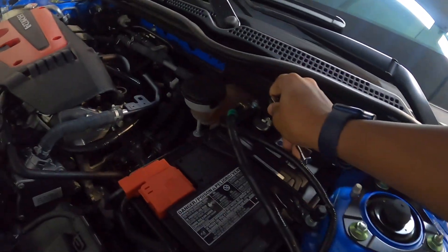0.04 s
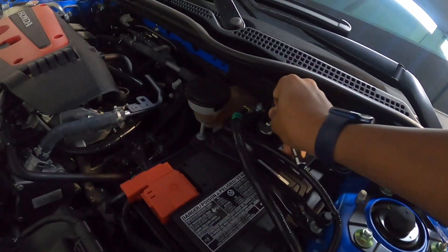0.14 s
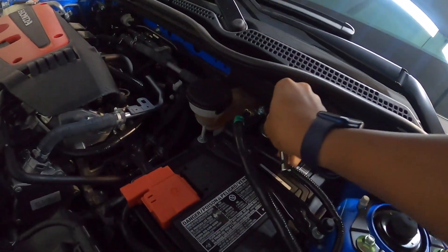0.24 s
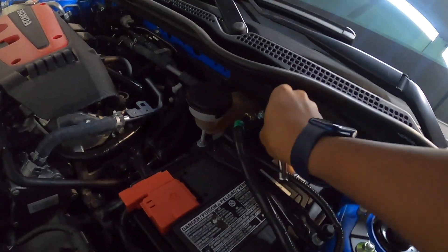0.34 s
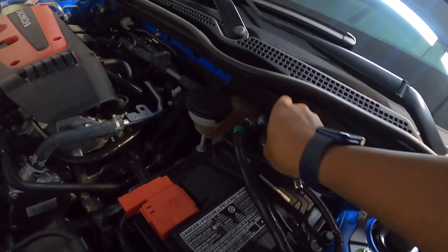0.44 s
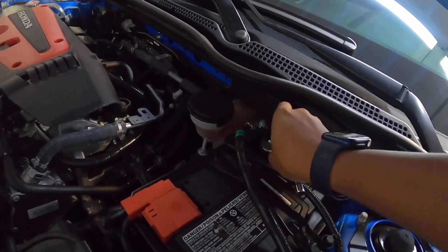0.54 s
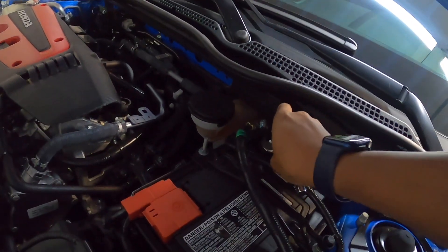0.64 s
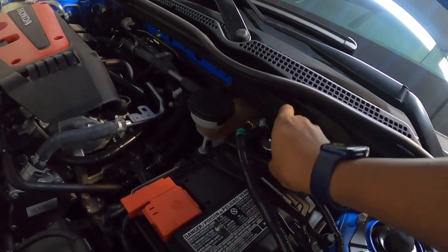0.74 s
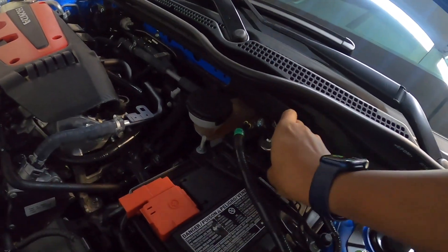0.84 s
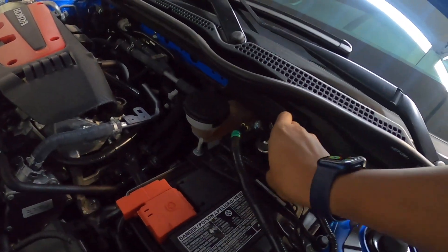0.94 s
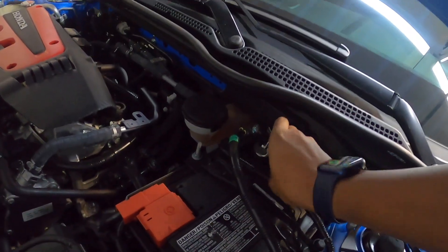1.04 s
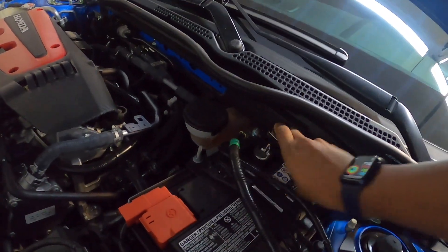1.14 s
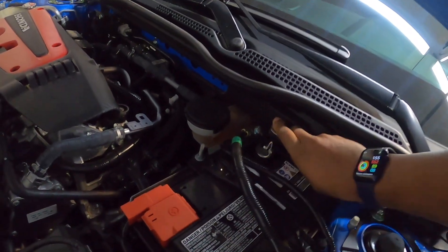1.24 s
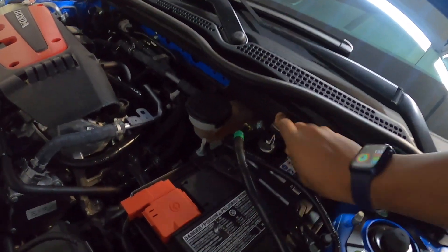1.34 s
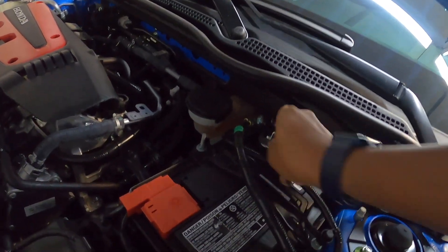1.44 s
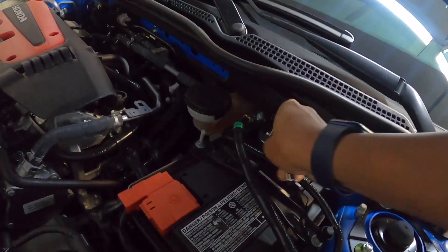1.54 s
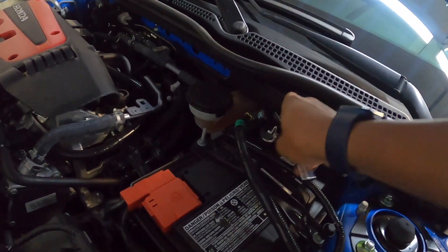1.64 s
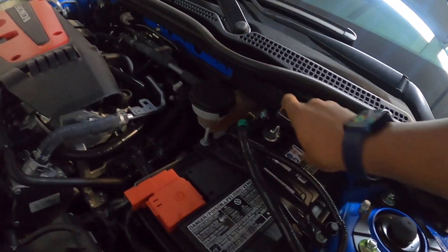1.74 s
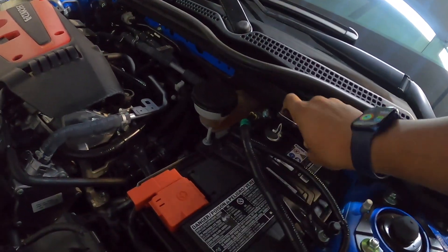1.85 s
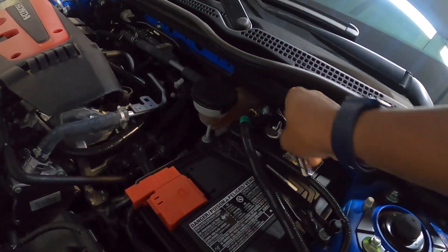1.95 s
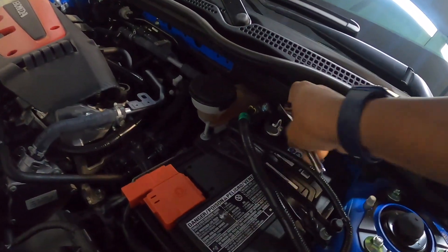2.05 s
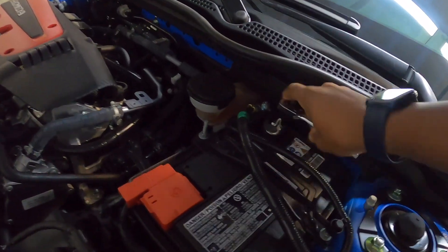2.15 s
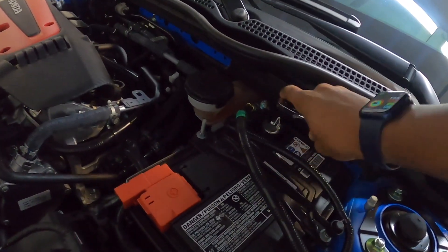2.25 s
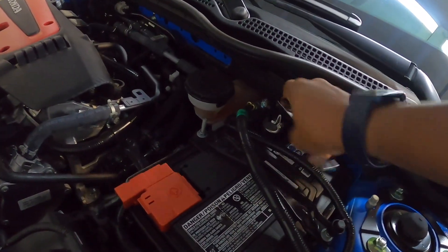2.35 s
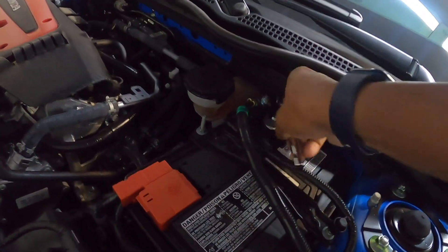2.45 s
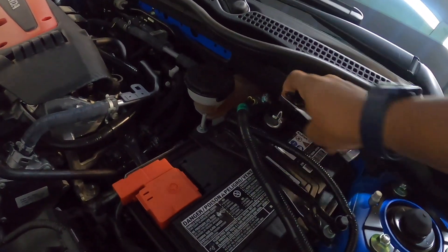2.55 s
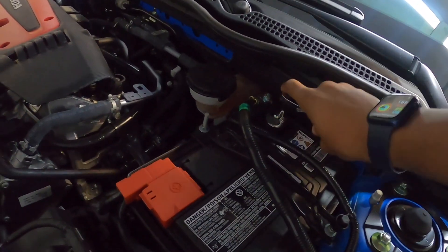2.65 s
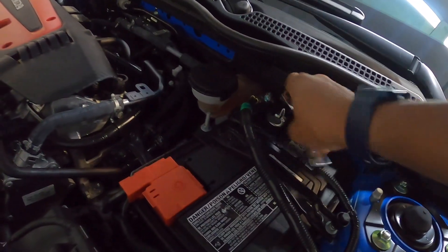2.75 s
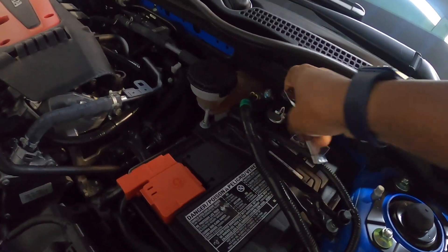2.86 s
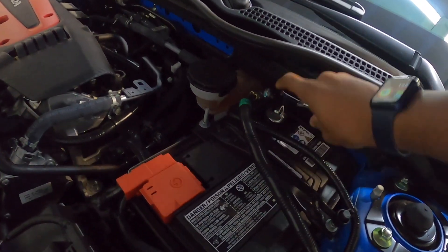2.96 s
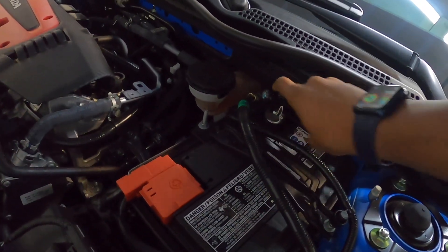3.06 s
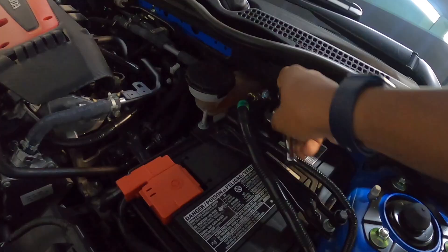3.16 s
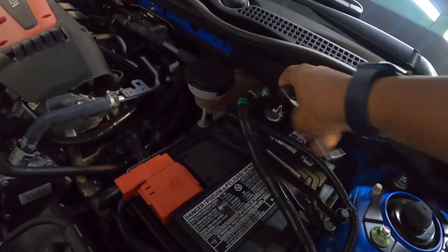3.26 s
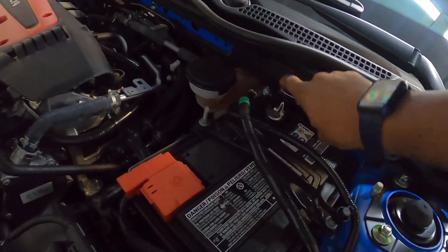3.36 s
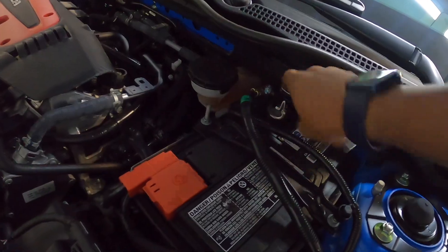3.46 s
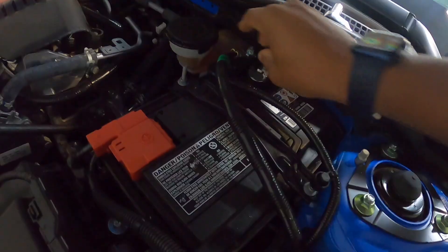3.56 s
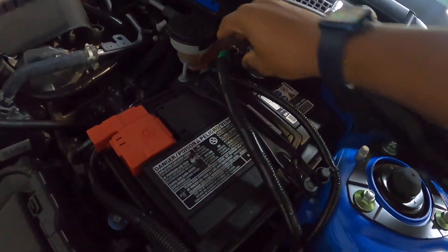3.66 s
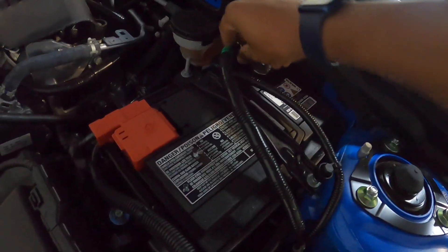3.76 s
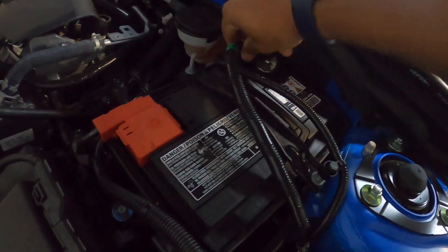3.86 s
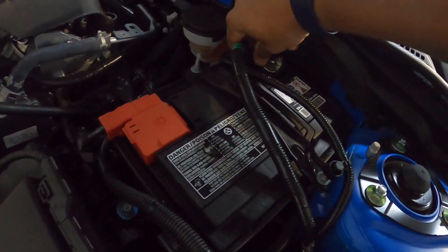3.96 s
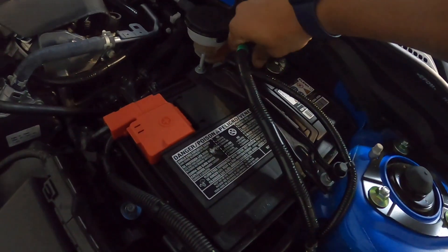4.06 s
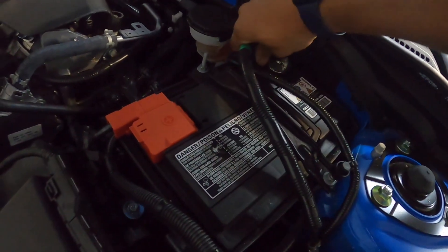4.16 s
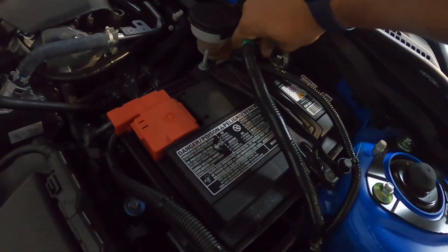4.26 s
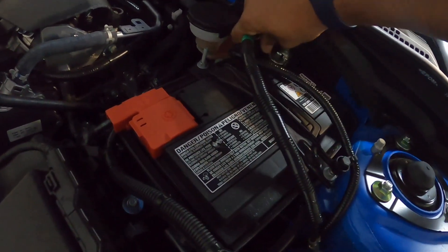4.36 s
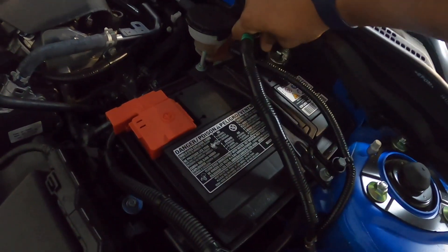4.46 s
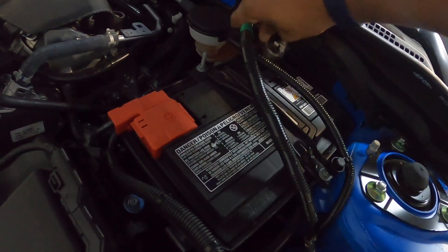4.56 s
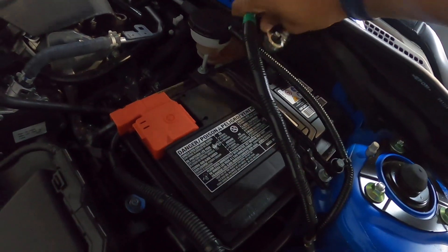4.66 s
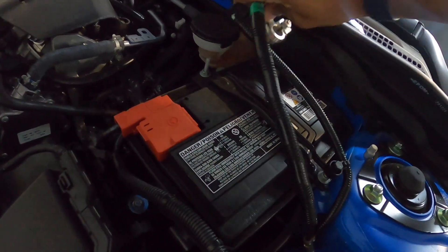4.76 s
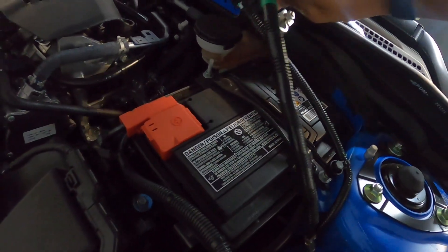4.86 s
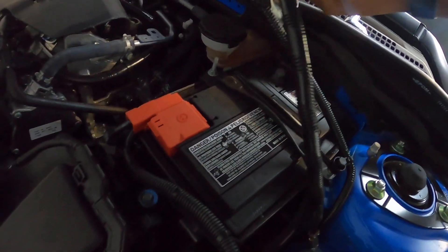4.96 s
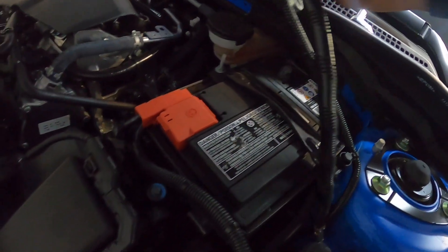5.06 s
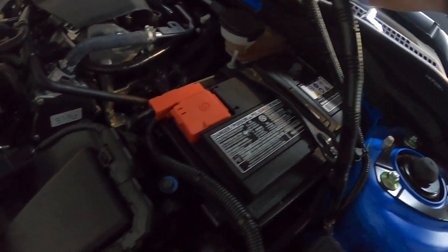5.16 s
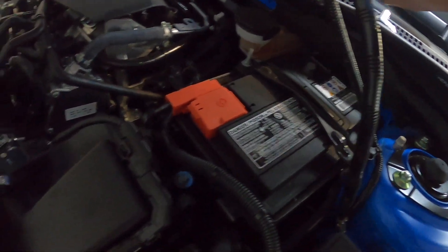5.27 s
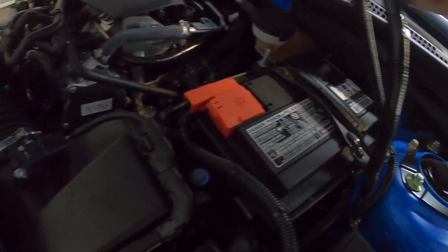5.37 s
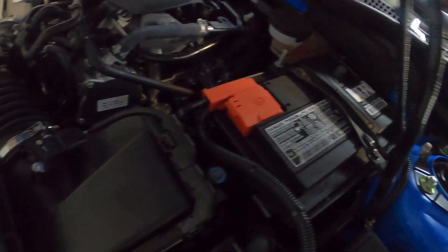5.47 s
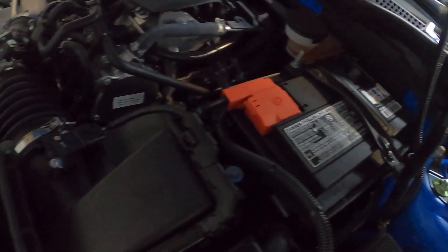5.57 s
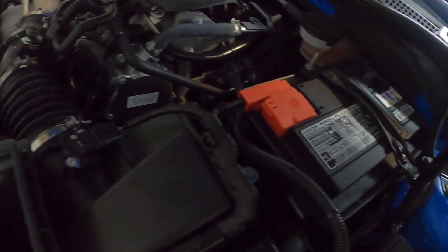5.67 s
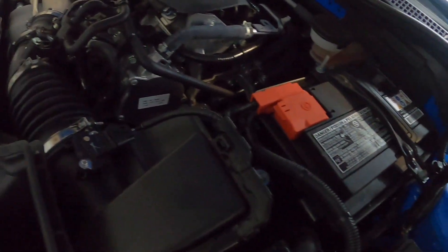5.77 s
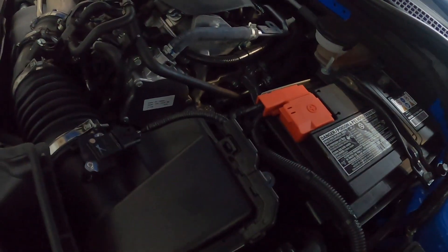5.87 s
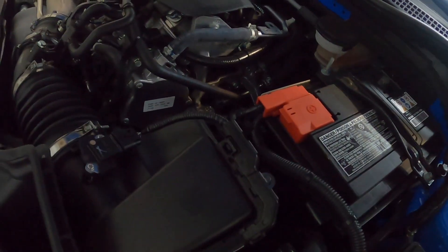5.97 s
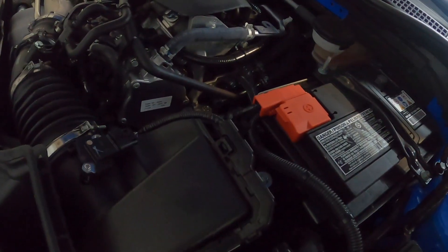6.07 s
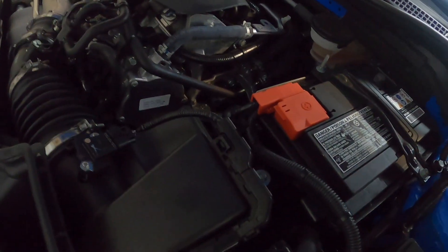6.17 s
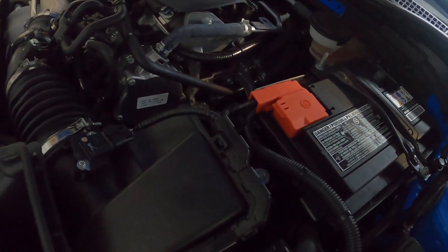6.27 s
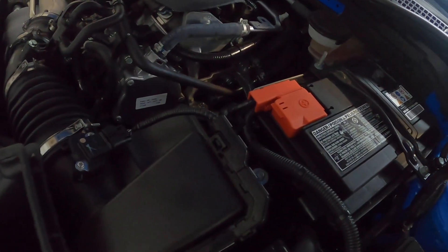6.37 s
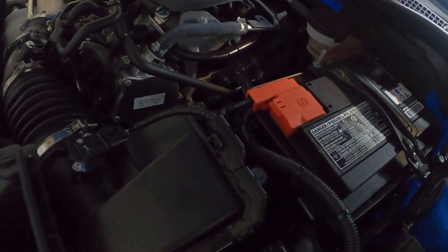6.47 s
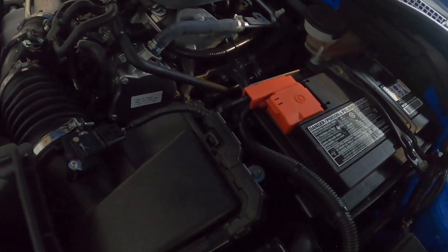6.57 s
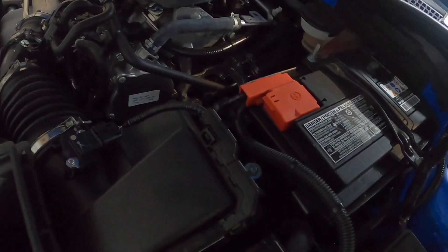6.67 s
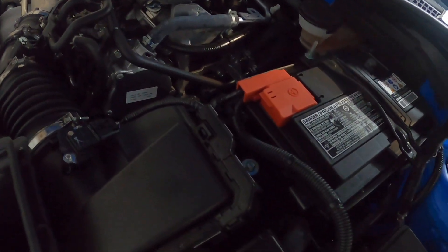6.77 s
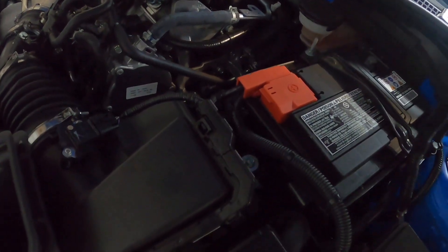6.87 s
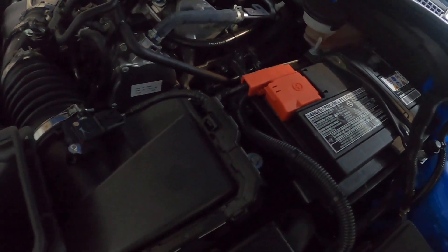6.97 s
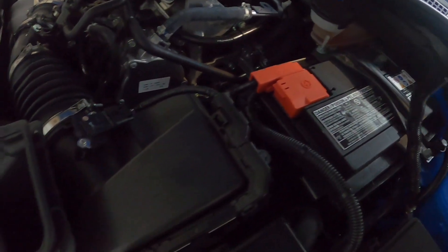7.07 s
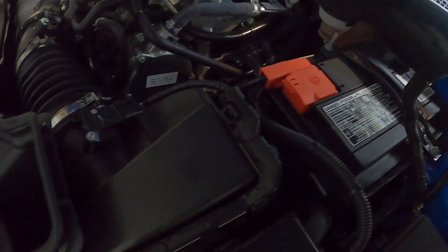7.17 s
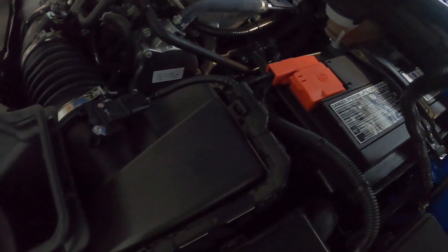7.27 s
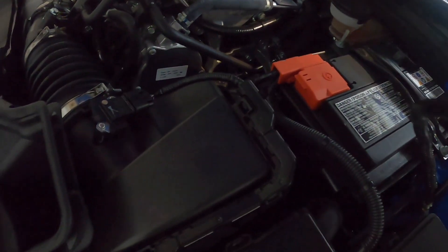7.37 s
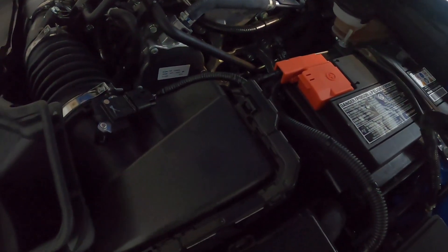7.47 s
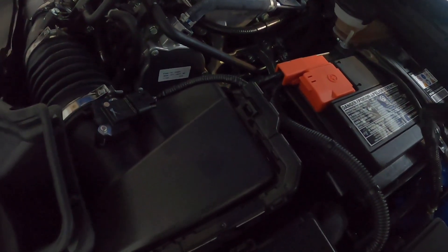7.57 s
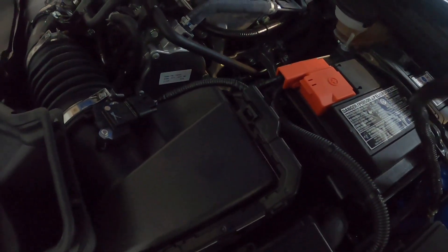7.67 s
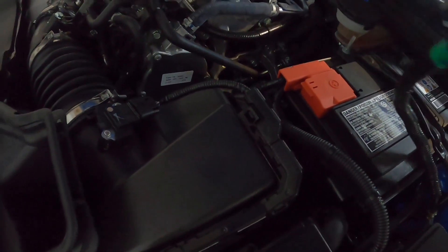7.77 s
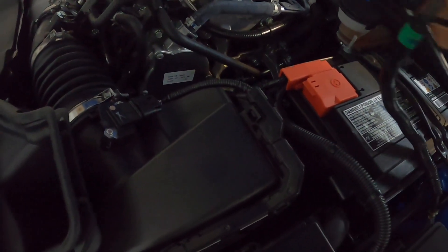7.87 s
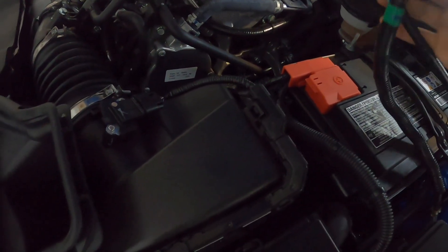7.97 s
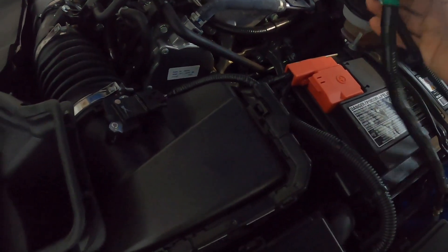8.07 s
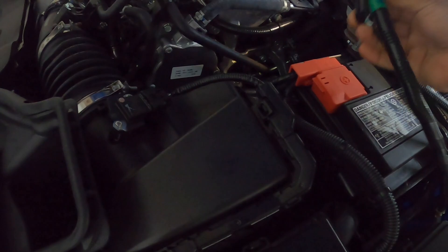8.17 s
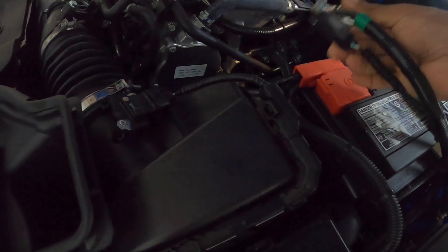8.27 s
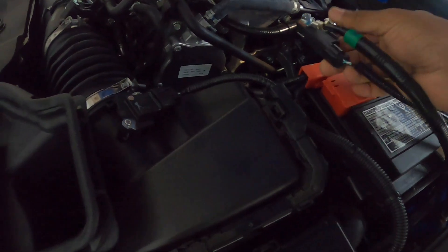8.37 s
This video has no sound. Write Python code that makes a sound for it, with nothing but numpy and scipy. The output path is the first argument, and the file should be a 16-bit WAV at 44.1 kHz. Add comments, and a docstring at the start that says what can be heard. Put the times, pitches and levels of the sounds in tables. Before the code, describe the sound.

Close above a car engine bay in a garage, a far air tool whirs down while metal knocks once sharply. A ratchet then clicks in quick separate runs, with loose clanks, short squeaks and sinking thuds on the battery case between. After a tiny break, clamp knocks and a hard bump follow. Later there is mostly soft rumbling air, dry plastic ticks and one rapid zip of a ribbed cable sleeve.

```python
"""A ratchet wrench loosens a car battery terminal in a garage, heard from close above the engine bay.
Runs of pawl clicks come from noise bursts ringing metal modes; between them loose parts knock and squeak.
Blows make the battery case thud with sinking tones. Later the ribbed cable sleeve ticks and zips aside.
Hands and cable rub as filtered noise, a far air tool whirs away in puffs, and ventilation rumbles softly.
Random reflections place the work in the engine bay and the garage."""
import sys
import numpy as np
from scipy import signal
from scipy.fft import rfft, irfft, next_fast_len
from scipy.io import wavfile
from scipy.ndimage import uniform_filter1d

SR = 44100
rng = np.random.default_rng(int(sys.argv[2]) if len(sys.argv) > 2 else 0)


def to_wav(sig):
    """Store sig (one row per channel, or 1-D mono) as 16-bit WAV at the path in sys.argv[1].

    Samples outside -1..1 are clipped; the rate is SR.
    """
    pcm = np.clip(np.atleast_2d(sig), -1, 1) * 32767
    pcm = np.round(pcm).astype(np.int16)
    wavfile.write(sys.argv[1], SR, pcm.T)  # frames by channels


N = 371010
TIME = np.arange(N) / SR

# In hit tables, level_db is the level before the band balance, and brightness tilts it around PIVOT_HZ.
# Pawl dropping over a tooth: start_s, level_db, brightness_db_per_octave, head_ring_db (re the click)
PAWL_CLICKS = [(1.3968, -25.5, -4.5, 2), (1.4114, -24.5, 0, 0.5), (1.4275, -22.5, -1, -3),
               (1.442, -24.5, 2.5, -2), (1.4555, -25, 1, -3), (1.470, -23, 1.5, -1),
               (1.4855, -19, -2.5, -4.5), (1.500, -23.5, 1.5, -4), (1.5166, -22, -1, -7),
               (1.5425, -22.5, 0, -16), (1.743, -26.5, -1.5, -6.5), (1.9375, -23.5, 1, 2.5),
               (1.948, -24, -1, 1), (1.9585, -21, 0.5, -2), (1.9685, -21, -0.5, -0.5),
               (1.9793, -20.5, 0, -1.5), (1.992, -23.5, 0.5, 2), (2.0097, -21.5, 1.5, -4.5),
               (2.3823, -24, 1, -2), (2.3924, -21, -4, 1), (2.4008, -20, -0.5, -2), (2.409, -21.5, 2, 3),
               (2.4155, -18, 0, -3), (2.422, -22, 0, -3), (2.4303, -19.5, 0, -5), (2.4396, -18.5, 0, 1.5),
               (2.4542, -21, -1, -1), (2.7405, -21, -6, 0), (2.7718, -22, -1, 4), (2.7815, -23, -1, 3),
               (2.7895, -22.5, 1, 6.5), (2.7973, -22.5, 0.5, 6), (2.8045, -20.5, -2.5, -1),
               (2.8116, -22, 1, 4.5), (2.8202, -23.5, -2, -5), (2.8285, -25, 0.5, 1), (2.8392, -22, 0, -7),
               (2.989, -23, 0, -1), (3.137, -32, 3, 0), (3.146, -22.5, 0, -1), (3.156, -21.5, 1, -5),
               (3.163, -26, -0.5, -1), (3.1695, -22, 1, 1.5), (3.1778, -19.5, -1, 1),
               (3.1863, -24.5, 1.5, -2), (3.195, -23.5, 0.5, 3), (3.2085, -26.5, 1.5, -6),
               (3.2317, -28.5, 2, 3.5), (3.5096, -26, 0.5, 0), (3.5217, -29, 3, 5), (3.5308, -22.5, 1, 3),
               (3.5383, -25.5, 0.5, 6), (3.5462, -21.5, -1, 2), (3.5528, -21, 1, 2), (3.5594, -21.5, 0, 0),
               (3.5662, -22.5, -1, -4), (3.5735, -24.5, 0.5, 7)]
# Socket, nut and clamp knocking: start_s, level_db, brightness_db_per_octave, low_thud_db (re the knock)
METAL_KNOCKS = [(.2695, -10, 2, -20.5), (.436, -35, 0, -12), (.46, -37, -7, -4), (.474, -56, -17.5, -9),
                (.711, -48, -3.5, -8), (1.344, -34, 0, -15), (1.3565, -31.5, 7, -11), (1.375, -35, -6, -2),
                (1.588, -29.5, -5, -13), (1.704, -37, 7, -16), (1.874, -42.5, -1, -26),
                (1.885, -42, -3, -20), (1.901, -38.5, -10.5, -8), (1.922, -30, -1.5, -3.5),
                (2.088, -32.5, 2, -3.5), (2.332, -32, 1, -16), (2.353, -25, 0.5, -8.5),
                (2.562, -24, 0.5, -19.5), (2.726, -34, 0, -7), (2.757, -28.5, 6, -8),
                (2.895, -25.5, -3.5, -12.5), (2.919, -26.5, 3.5, -9.5), (2.936, -30, -2, -8),
                (2.967, -41, 10.5, -10), (3.093, -27, -4, -9.5), (3.123, -21.5, -1, -27),
                (3.254, -29.5, -5, -25), (3.283, -30.5, -2, -12), (3.311, -35.5, 0, -7),
                (3.478, -27, 1.5, -13), (3.72, -45.5, 2.5, -1.5), (3.943, -53, 9, 3),
                (4.029, -37.5, 9.5, -7.5), (4.035, -25.5, -7, -11.5), (4.041, -28, -10, -20),
                (4.0485, -25.5, -6, -34), (4.281, -32.5, 9.5, -1), (4.299, -21, -6, -19),
                (4.311, -33, 8, 5), (4.332, -28, -8.5, -6), (4.343, -31, 13, -14), (4.399, -41, 5, -7),
                (4.488, -40.5, 11.5, 5), (4.529, -20.5, -4, -13), (4.574, -37.5, 6, -10)]
# Wrench and clamp hitting the battery: start_s, crack_db, brightness_db_per_octave, thud_peak_db,
# start_pitch_hz, final_pitch_hz, swell_s
BATTERY_BLOWS = [(.277, -41, -2, -30, 260, 154, 0.0077), (1.226, -28.5, 2.5, -21, 603, 244, 0.0034),
                 (1.366, -48, -8, -32.5, 397, 210, .007), (1.619, -39, 2, -31, 396, 168, 0.0055),
                 (2.103, -35, -4, -35, 400, 180, 0.0088), (2.211, -25.5, -1.5, -22.5, 610, 200, 0.005),
                 (2.6305, -23.5, -3, -16, 615, 179, 0.0054), (2.997, -30.5, -5.5, -18, 530, 181, 0.006),
                 (3.372, -23.5, 0, -24, 504, 132, 0.0072), (4.309, -35, 10, -36, 500, 220, 0.0056),
                 (4.3375, -24, -2, -35, 506, 200, 0.0038), (4.345, -39, -6, -22.5, 400, 194, 0.0061),
                 (4.747, -17, 5, -15, 620, 200, 0.0049)]
# Plastic cable sleeve catching on edges: start_s, level_db, brightness_db_per_octave
SLEEVE_TICKS = [(4.637, -38, -2), (4.647, -33, -3), (4.675, -34, -3), (4.95, -32, -2), (5.001, -28.5, -2),
                (5.154, -50.5, 1), (5.3, -47.5, 9), (5.954, -44, -6.5), (6.227, -46.5, -2.5),
                (6.396, -39.5, -7.5), (6.497, -21.5, -3), (7.2175, -25, -1), (7.96, -41.5, -5.5),
                (8.095, -54.5, 3.5), (8.243, -51, 2.5), (8.274, -40.5, 1.5), (8.299, -35, -5.5),
                (8.314, -37, -7), (8.4048, -19, -1)]
# Ribs of the sleeve pulled over an edge: start_s, level_db, brightness_db_per_octave
RIB_SNAPS = [(7.1252, -39.5, -1.5), (7.165, -36.5, -2.5), (7.192, -31.5, 0), (7.2168, -29.5, 1),
             (7.2282, -31, -1), (7.245, -35, -4), (7.2562, -31.5, -1.5), (7.2667, -38, -4),
             (7.284, -36, -1), (7.3, -32.5, -2.5), (7.322, -28.5, -1), (7.344, -30, -2),
             (7.3608, -28, -1.5), (7.3757, -29.5, -2), (7.3872, -30, -1), (7.3993, -31, -2.5),
             (7.411, -31, -0.5), (7.4244, -33.5, -4.5), (7.444, -30.5, -1), (7.4734, -30.5, -1.5)]
# Parts slipping under load: start_s, length_s, start_pitch_hz, final_pitch_hz, half_width_hz,
# level_db (before the fades)
SLIPS = [(1.3, 0.073, 1880, 1750, 300, -47.5), (1.344, 0.01, 1650, 1450, 400, -35),
         (1.355, 0.018, 1280, 850, 372, -27), (1.875, 0.038, 1520, 1150, 350, -39.5),
         (2.332, .034, 1620, 1750, 420, -29), (2.354, 0.053, 1380, 1150, 354, -31),
         (2.722, .016, 1400, 1250, 220, -30), (2.741, 0.0094, 1090, 800, 300, -24.5),
         (2.757, 0.032, 1400, 1600, 500, -29.5), (2.989, 0.024, 2230, 2200, 300, -26.5),
         (3.092, 0.068, 1500, 1190, 452, -29), (3.4778, 0.027, 1710, 1400, 424, -23),
         (4.03, 0.028, 1020, 900, 200, -29.5), (4.045, 0.014, 930, 744, 200, -20.5),
         (4.272, 0.037, 1950, 1700, 400, -33.5), (4.295, .02, 2100, 1500, 513, -25),
         (4.313, 0.011, 2550, 2450, 350, -31), (4.338, 0.018, 2400, 1430, 495, -22.5),
         (4.479, 0.04, 1880, 1700, 270, -34), (4.519, .025, 1710, 1950, 240, -31),
         (7.82, 0.11, 3770, 3830, 300, -59), (7.938, .03, 4680, 4500, 120, -60),
         (8.314, 0.039, 6300, 6200, 70, -52)]
# Hand on wrench and clamp: start_s, length_s, scrape_db, hiss_db
HAND_RUBS = [(0.8, 0.19, -54, -62.5), (1.1, 0.24, -53, -56), (1.301, 0.36, -47, -56.5),
             (1.659, 0.18, -46, -54), (2.04, 0.27, -59, -59), (2.45, 0.92, -53.5, -61.5),
             (3.102, 0.44, -51, -74), (3.919, 0.35, -54, -59), (4.334, 0.24, -60, -71),
             (4.499, 0.37, -49, -48.5), (4.774, 0.3, -57.5, -86)]
# Cable sliding aside: start_s, length_s, scrape_db, hiss_db
CABLE_SLIDES = [(6.737, 0.22, -82, -65.5), (7.61, 0.35, -71, -61.5), (7.935, 0.46, -60, -62),
                (8.249, 0.21, -49, -57)]
# Moving air: time_s, rumble_db, air_db
VENTILATION_LEVELS = [(0, -67.5, -60), (1.1, -58, -61), (3.6, -58, -58.5), (4.9, -57, -57),
                      (5.8, -51.5, -60), (7.0, -55, -58.5), (7.6, -51, -58), (8.4, -52.5, -58)]
# Far air tool: time_s, turns_per_s, level_db
TOOL_SPEED = [(0, 156, -43), (.12, 167, -46), (.24, 80, -45.5), (.45, 118, -49.5), (.7, 120, -76),
              (.9, 130, -110)]

# Band edges of each kind of hit: edge_hz
PAWL_EDGES = [500, 1400, 2800, 5500, 14000]
KNOCK_EDGES = [130, 450, 1300, 2600, 5200, 14000]
BLOW_EDGES = [600, 1300, 2600, 5500, 14000]
SLEEVE_EDGES = [500, 2000, 6000, 14000]
# Balance of each kind of hit, one value for each band: balance_db
PAWL_BALANCE = [-9.5, -1.5, -1.5, -7.5]
KNOCK_BALANCE = [-2.5, -12.5, -4, -8, -26.5]
BLOW_BALANCE = [-5.5, -7.5, -7.5, -23.5]
SLEEVE_BALANCE = [-14, -4.5, -9]
RIB_BALANCE = [-9.5, -8, -13]

# Ringing modes of each part: pitch_hz, width_hz, relative_level_db
WRENCH_RING = [(1030, 400, 6), (2020, 180, 14.5), (2550, 130, -1), (3220, 490, 3), (3800, 460, 3.5),
               (4420, 440, 4), (5000, 450, -0.5), (6890, 320, 7.5), (11100, 1200, -10.5)]
CLAMP_RING = [(184, 38, 14), (329.6, 39, 1.7), (797, 89, 21.6), (970, 130, 16), (1010, 560, 7),
              (1520, 100, 9.3), (1902, 210, 18.5), (3850, 1100, 21.7), (4500, 600, 1.7), (6900, 1400, 2)]
BATTERY_RING = [(77, 17, -32), (173.8, 21, 2), (250, 160, -18), (320, 71, -4), (357, 49, 13.5),
                (440, 18, -17.5), (640, 140, -13), (860, 170, -30), (1050, 52, -6), (2200, 230, -14.5)]
CASE_WALL_RING = [(166, 30, 35.5), (475, 130, 16)]
SLEEVE_RING = [(1793, 100, -24), (2395, 430, 8.5), (3330, 1240, 21), (4500, 280, 15), (7800, 540, -20.5),
               (9660, 940, 0)]
RIB_RING = [(1730, 280, 7), (2400, 770, 10), (3730, 210, 7), (4850, 210, -1), (6800, 810, -8),
            (9900, 1500, -2)]
HOLLOW_RING = [(283, 74, 21.5), (674, 90, 27.5)]  # air inside the sleeve

# Spectrum shapes of the steady noises: frequency_hz, relative_level_db
SCRAPE_SHAPE = [(180, -22), (300, 1), (411, -11.5), (655, -5.5), (804, -15), (1400, -5.5), (1640, -5),
                (2620, -6.5), (3050, -11), (4000, -9), (5200, -49), (8800, -120)]
HISS_SHAPE = [(1760, -2), (3000, -1), (3950, -7), (4460, 0.5), (6870, -3), (8290, -6.5), (11000, -8.5),
              (13400, -18), (15000, -72)]
RUMBLE_SHAPE = [(12, -45), (20, -17), (97, -4), (157, -7.5), (217, -12), (254, -21), (285, -43), (347, -60),
                (375, -18.5), (411, -44.5), (450, -36), (580, -48), (990, -120)]
AIR_SHAPE = [(180, -13), (300, -7), (405, -9), (478, -17.5), (774, -8), (915, -8), (1340, -6), (1510, -8.5),
             (2840, -17.5), (3130, -20.5), (6850, -28.5), (7820, -35), (9550, -33.5), (16000, -42)]
TOOL_SHAPE = [(240, -5.5), (400, -9), (470, -8), (910, -16), (1030, -15.5), (1220, -14), (2040, -7.5),
              (2240, -9.5), (2710, -7), (2980, -10), (4340, -7.5), (4960, -18.5), (6860, -24), (10000, -47),
              (13000, -79.5), (22000, -120)]

# Reflections from nearby parts, engine bay and garage: frequency_hz, level_db (re the sound sent in), t60_s
NEAR_ECHOES = [(97.4, 0, 0.024), (986, -4, 0.032), (4050, -1.5, 0.016), (13800, -5, 0.081)]
BAY_ECHOES = [(101.6, 4.5, 1), (187, 8, 0.32), (434, 1.5, 0.29), (1030, -5, 0.056), (3030, -8.5, 0.16),
              (7000, -8, 0.18), (14250, -12, 0.29)]
GARAGE_ECHOES = [(101.3, 7.5, 0.29), (200, -9, 0.84), (535, -1, 0.57), (1993, -15.5, 0.88),
                 (5000, -14, 0.74), (7840, -12, 0.85), (14000, -33, 0.92)]
# Shape of the stereo side signal: frequency_hz, relative_level_db
SIDE_SHAPE = [(100, -54), (500, -58.5), (1000, -67), (4000, -29.5), (8000, -18), (11000, -8.5), (13500, 15)]

PIVOT_HZ = 2000
RUB_ATTACK_S, RUB_RELEASE_S = 0.054, 0.13
GRIT_PER_S, GRIT_DB = 110, -6  # tiny metal ticks; dB re the scrape
SQUEAK_FADE_DB = -15  # over the length of a squeak, as the load eases
CHATTER_S, CHATTER_DB = 0.008, -9  # nominal time between slips; fall of each before the next
SAG_S = 0.0044  # the pitch of a thud sinks as the blow spreads through the case
TRAY_HZ, TRAY_DB, TRAY_SWELL_S = 104, -20, 0.01  # battery rocking on its tray; dB re the thud
HOLLOW_FOLLOWS = 0.36  # share of a rib's change in level that reaches the hollow
SHIFTS_PER_S = 32
PAWL_ECHO_DB, THUD_ECHO_DB, RIB_ECHO_DB = -2, -8, 0.5  # sent into the reflections
BREAK_S = 3.583  # the work and its ringing break off short here
CUTOFF_HZ = 16000


def from_db(db):
    """Turn decibels into a gain."""
    return 10 ** (np.asarray(db) / 20)


def rms_one(x):
    """Scale a sound to an rms of 1."""
    return x / np.sqrt(np.mean(x ** 2) + 1e-20)


def in_time(rows):
    """Read the columns of a curve at every sample."""
    s, *columns = np.transpose(rows)
    return [np.interp(TIME, s, column) for column in columns]


def at_hz(rows, hz):
    """Read the columns of a table on a log-frequency axis."""
    table_hz, *columns = np.transpose(rows)
    return [np.interp(np.log(hz + 1e-9), np.log(table_hz), column) for column in columns]


def colour(x, spectrum):
    """Filter a sound by a smooth spectrum."""
    size = next_fast_len(N)
    hz = np.arange(size // 2 + 1) * SR / size
    gain = from_db(at_hz(spectrum, hz)[0])
    return irfft(rfft(x, size) * gain, size)[:N]


def band(x, low, high, order=3):
    """Keep one band of frequencies."""
    sos = signal.butter(order, [low, high], "band", fs=SR, output="sos")
    return signal.sosfilt(sos, x + 1e-18)


def drift(rate):
    """Wander at random with an rms of 1, through rate new points per second."""
    knots = rng.standard_normal(N // 10)
    return rms_one(np.interp(TIME * rate, np.arange(len(knots)), knots))


def resonate(x, hz, width):
    """Ring one resonance with a gain of 1 at its peak; a narrower one rings longer."""
    r = np.exp(-np.pi * width / SR)
    feed = np.array([1, 0, -1]) * (1 - r * r) / 2
    feedback = [1, -2 * r * np.cos(2 * np.pi * hz / SR), r * r]
    return signal.lfilter(feed, feedback, x + 1e-18)


def drum(hits, modes, vary_db):
    """Each hit jolts a hollow body and rings its modes."""
    jolts = np.zeros(N)
    for s, db, *_ in hits:
        strength = from_db(db + vary_db * rng.standard_normal())
        jolts[int(s * SR)] = strength * rng.choice([-1, 1])
    return sum(from_db(db) * resonate(jolts, hz, width) for hz, width, db in modes)


def strike(hits, bands_hz, modes, contact_t60, rise_s, snap_db, crack_db, vary_db, balance_db,
           detune=0, hold_s=0, own_band=0):
    """Each hit is a brief chatter of contact that cracks and rings modes; its brightness tilts the bands.

    Grip and point of contact change the strength and tuning (detune, octaves) of the modes. A fourth column
    sets the level of one band (own_band) apart from the tilt."""
    times, level_db, brightness, *own_db = np.transpose(hits)
    t = TIME[:SR // 8]
    fade = from_db(-60 * np.maximum(t - hold_s, 0) / contact_t60)
    pressure = (1 - np.exp(-(t / rise_s) ** 2)) * fade
    contact = rng.standard_normal((len(hits), len(t))) * pressure
    # the first touch adds one clean impulse
    contact[:, 0] += from_db(snap_db) * np.linalg.norm(pressure)

    strengths = from_db(vary_db * rng.standard_normal((len(hits), len(modes))))
    tunings = 2 ** (detune * rng.uniform(-0.87, 1, (len(hits), len(modes))))
    rung = from_db(crack_db) * contact
    for k, (hz, width, db) in enumerate(modes):
        rings = np.array([resonate(touch, hz * tuning, width)
                          for touch, tuning in zip(contact, tunings[:, k])])
        rung = rung + from_db(db) * strengths[:, [k]] * rings

    sounds = 0
    for k, (low, high) in enumerate(zip(bands_hz, bands_hz[1:])):
        part = band(rung, low, high)
        power = uniform_filter1d(part ** 2, size=256, axis=1)
        loudest = np.sqrt(power.max(axis=1))
        if own_db and k == own_band:
            lift_db = own_db[0]
        else:
            lift_db = brightness * np.log2(np.sqrt(low * high) / PIVOT_HZ)
        gain = from_db(level_db + balance_db[k] + lift_db) / loudest
        sounds = sounds + part * gain[:, None]

    out = np.zeros(N + len(t))
    for s, sound in zip(times, sounds):
        start = int(s * SR)
        out[start:start + len(t)] += sound
    return out[:N]


def far_tool():
    """An air tool whirs away: a slightly uneven puff at every turn, blurred by rushing air."""
    speed, level_db = in_time(TOOL_SPEED)
    turns = np.cumsum(speed * (1 + 0.0025 * drift(60))) / SR
    puffs = rms_one(np.diff(np.floor(turns), prepend=0))
    rush = 1.9 * rng.standard_normal(N)
    return from_db(level_db) * rms_one(colour(puffs + rush, TOOL_SHAPE))


def ventilation():
    """A slightly wavering low rumble under smooth moving air, both made of filtered noise."""
    rumble_db, air_db = in_time(VENTILATION_LEVELS)
    rumble = rms_one(colour(rng.standard_normal(N), RUMBLE_SHAPE))
    air = rms_one(colour(rng.standard_normal(N), AIR_SHAPE))
    return from_db(rumble_db + 0.37 * drift(34)) * rumble + from_db(air_db) * air


def terminal():
    """Loose metal knocks, and the crack of the heavier blows on the battery case."""
    vary_db, detune = 3, 0.22
    knocks = strike(METAL_KNOCKS, KNOCK_EDGES, CLAMP_RING, contact_t60=0.012, rise_s=0.0007,
                    snap_db=0, crack_db=6, vary_db=vary_db, balance_db=KNOCK_BALANCE, detune=detune)
    blows = [row[:3] for row in BATTERY_BLOWS]
    cracks = strike(blows, BLOW_EDGES, BATTERY_RING, contact_t60=0.014, rise_s=0.001,
                    snap_db=1, crack_db=-6, vary_db=vary_db, balance_db=BLOW_BALANCE, detune=detune)
    return knocks + cracks


def swell(t, peak_s):
    """Rise to a peak of 1 at peak_s, then die away."""
    return (t / peak_s * np.exp(1 - t / peak_s)) ** 2


def thuds():
    """The damped battery case swings deeply, sinking in pitch; the tray follows and the walls ring on."""
    out, t = np.zeros(N + SR), TIME[:SR // 8]
    tray = from_db(TRAY_DB) * swell(t, TRAY_SWELL_S) * np.sin(2 * np.pi * TRAY_HZ * t)
    for s, _, _, db, start_hz, end_hz, swell_s in BATTERY_BLOWS:
        hz = end_hz + (start_hz - end_hz) * np.exp(-t / SAG_S)
        case = swell(t, swell_s) * np.sin(2 * np.pi * np.cumsum(hz) / SR)
        start = int(s * SR)
        out[start:start + len(t)] += from_db(db) * (case + tray)
    jolts = [(s, db) for s, _, _, db, *_ in BATTERY_BLOWS]
    return out[:N] + drum(jolts, CASE_WALL_RING, vary_db=2.5)


def friction(spectrum, grain_db, patchy_db):
    """Countless tiny slips of uneven size, coming in clumps."""
    size_db = grain_db * drift(830) + patchy_db * drift(45)
    slips = rng.standard_normal(N) * from_db(size_db)
    return rms_one(colour(slips, spectrum))


def grit():
    """Sparse little metal ticks, each ringing briefly at one of ten pitches."""
    pitches = np.geomspace(1100, 3200, num=10)
    sizes = from_db(4 * np.minimum(rng.exponential(1, N), 3))
    ticks = sizes * (rng.random(N) < GRIT_PER_S / SR)
    dealt = rng.integers(0, len(pitches), N)
    return rms_one(sum(resonate(ticks * (dealt == k), hz, 0.1 * hz) for k, hz in enumerate(pitches)))


def rubbing(strokes, patchy_db, ticks=0):
    """A low scrape and a fine hiss swell, hold and fade with the pressure."""
    scrape = friction(SCRAPE_SHAPE, grain_db=-3.0, patchy_db=patchy_db) + ticks
    hiss = friction(HISS_SHAPE, grain_db=1.5, patchy_db=patchy_db)
    out = 0
    for s, length, scrape_db, hiss_db in strokes:
        rise = (TIME - s) / RUB_ATTACK_S
        fall = (s + length - TIME) / RUB_RELEASE_S
        pressure = np.clip(np.minimum(rise, fall), 0, 1)
        out = out + pressure * (from_db(scrape_db) * scrape + from_db(hiss_db) * hiss)
    return out


def handling():
    """Metal rubs grittily under the hand; the plastic cable slides smoothly."""
    hand = rubbing(HAND_RUBS, patchy_db=3.0, ticks=from_db(GRIT_DB) * grit())
    return hand + rubbing(CABLE_SLIDES, patchy_db=2.9)


def squeaks():
    """A part sticks and slips in a quick row, ringing one resonance that glides as the load eases."""
    out = np.zeros(N)
    for s, length, start_hz, end_hz, half_width_hz, db in SLIPS:
        count = int(length * SR)
        since_slip = (TIME[:count] / (CHATTER_S * rng.uniform(0.8, 1.4))) % 1
        slips = rng.standard_normal(count) * from_db(CHATTER_DB * since_slip)
        # turning the noise down to 0 Hz and back lets a low-pass act as a gliding resonance
        turn = np.exp(2j * np.pi * np.cumsum(np.geomspace(start_hz, end_hz, count)) / SR)
        low_pass = signal.butter(2, half_width_hz, fs=SR, output="sos")
        ringing = signal.sosfilt(low_pass, slips / turn)
        tone = rms_one((ringing * turn).real)
        progress = np.linspace(0, 1, count)
        fade = from_db(db + SQUEAK_FADE_DB * progress) * (1 - progress)
        start = int(s * SR)
        out[start:start + count] += fade * tone
    return out


def ratchet():
    """The pawl snaps onto each tooth and chatters; the jolt makes the battery case drum softly."""
    snaps = strike(PAWL_CLICKS, PAWL_EDGES, WRENCH_RING, contact_t60=0.008, rise_s=0.00056,
                   snap_db=-5, crack_db=-3.5, vary_db=1.5, balance_db=PAWL_BALANCE,
                   detune=0.06, hold_s=0.0015, own_band=1)
    case = drum(PAWL_CLICKS, BATTERY_RING, vary_db=3.5)
    return snaps + from_db(26.5) * band(case, 125, 205, order=2)


def sleeve():
    """Light, dry plastic ticks: short contacts that ring the sleeve."""
    return strike(SLEEVE_TICKS, SLEEVE_EDGES, SLEEVE_RING, contact_t60=0.005, rise_s=0.0019,
                  snap_db=5, crack_db=-5, vary_db=2, balance_db=SLEEVE_BALANCE, detune=0.15)


def ribs():
    """Each rib snaps over an edge; the air in the hollow sleeve rings on through the whole run."""
    snaps = strike(RIB_SNAPS, SLEEVE_EDGES, RIB_RING, contact_t60=0.006, rise_s=0.0095,
                   snap_db=5, crack_db=-3, vary_db=2, balance_db=RIB_BALANCE)
    usual_db = np.median([db for _, db, _ in RIB_SNAPS])
    puffs = [(s, usual_db + HOLLOW_FOLLOWS * (db - usual_db)) for s, db, _ in RIB_SNAPS]
    return snaps + drum(puffs, HOLLOW_RING, vary_db=1)


def echoes(space, onset_s):
    """Dense reflections build up and then die away, band by band."""
    t, edges, out = TIME[:SR], np.geomspace(70, 17000, 15), 0
    for low, high in zip(edges, edges[1:]):
        db, t60 = at_hz(space, np.sqrt(low * high))
        build_up = 1 - np.exp(-(t / onset_s) ** 2)
        tail = band(rng.standard_normal(SR), low, high, order=2) * from_db(-60 * t / t60) * build_up
        # give each band energy in step with its width
        out = out + from_db(db) * tail * np.sqrt(2 * (high - low) / SR / np.sum(tail ** 2))
    return out


def shifting(x, space, onset_s, count=3):
    """Hand, arm and tool keep moving, so the sound wanders between patterns of reflections."""
    shares = np.array([drift(SHIFTS_PER_S) for _ in range(count)])
    shares /= np.linalg.norm(shares, axis=0)
    return sum(signal.oaconvolve(x * share, echoes(space, onset_s))[:N] for share in shares)


def scene():
    """The work echoes in the engine bay and garage; the sound is central, wide only in the top octave."""
    clicks, body, zip_run = ratchet(), thuds(), ribs()
    knocks = terminal() + squeaks() + sleeve()
    work = from_db(PAWL_ECHO_DB) * clicks + knocks
    direct = clicks + knocks + body + zip_run + shifting(work, NEAR_ECHOES, onset_s=0.00049)
    sent = work + from_db(THUD_ECHO_DB) * body + from_db(RIB_ECHO_DB) * zip_run

    # the sound of the work drops out for 0.1 s, and its earlier echoes break off
    early = np.clip((BREAK_S - TIME) / 0.003, 0, 1)
    late = TIME > BREAK_S + 0.1
    garage = echoes(GARAGE_ECHOES, onset_s=0.0057)

    def reflect(x):
        """Add shifting engine bay reflections to steady garage ones."""
        return shifting(x, BAY_ECHOES, onset_s=0.0058, count=2) + signal.oaconvolve(x, garage)[:N]

    first, second = reflect(sent * early), reflect(sent * late)
    mid = direct * (early + late) + first * early + second
    mid = mid + handling() + far_tool() + ventilation()
    delayed = np.interp(TIME - 0.0011, TIME, mid)
    side = from_db(-6.0) * colour(delayed, SIDE_SHAPE)
    return np.array([mid + side, mid - side])


def record(dry):
    """The treble rolls off above 12 kHz and the top is cut."""
    soft = signal.sosfilt(signal.butter(7, 12000, fs=SR, output="sos"), dry)
    return signal.sosfilt(signal.ellip(10, 0.1, 80, CUTOFF_HZ, fs=SR, output="sos"), soft)


dry = scene()
out = record(dry)
to_wav(out)
```